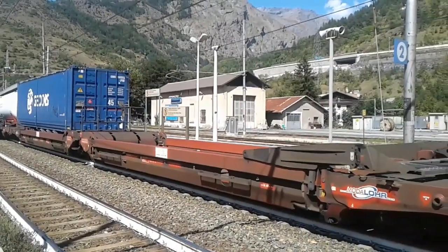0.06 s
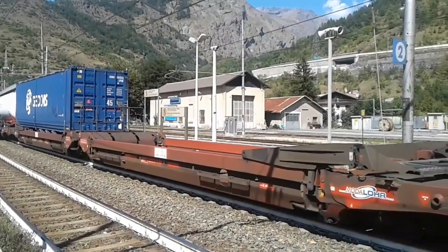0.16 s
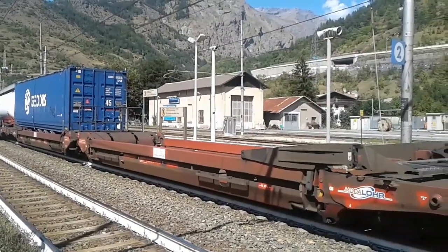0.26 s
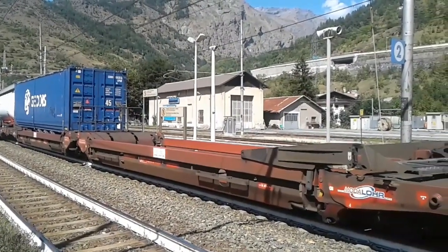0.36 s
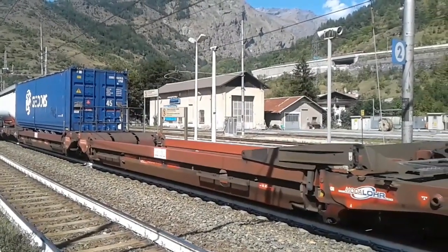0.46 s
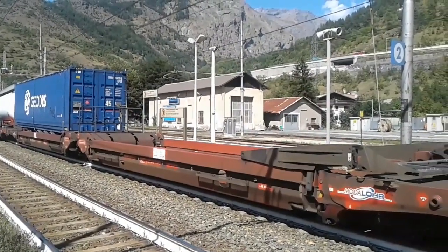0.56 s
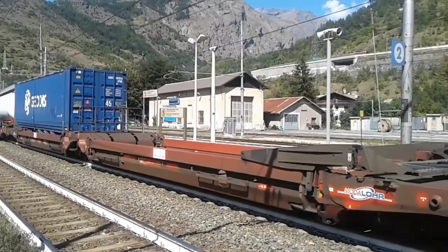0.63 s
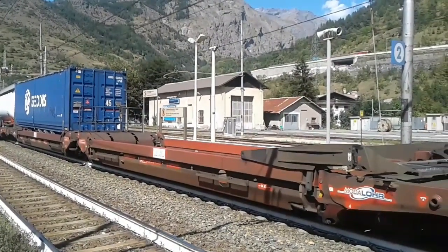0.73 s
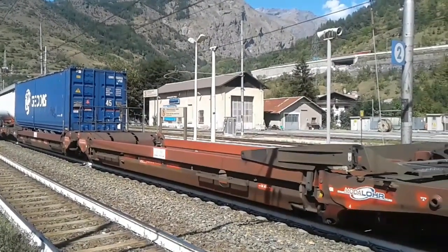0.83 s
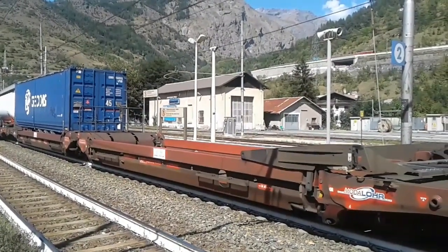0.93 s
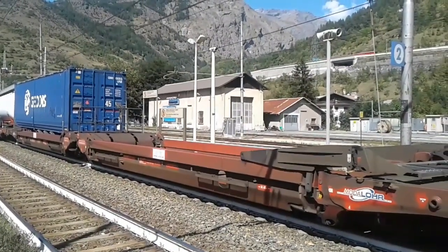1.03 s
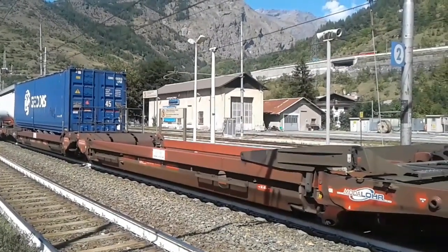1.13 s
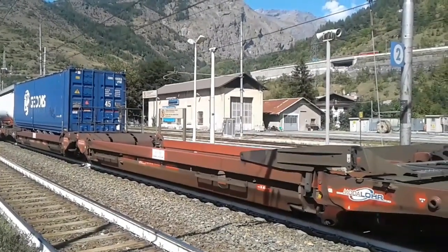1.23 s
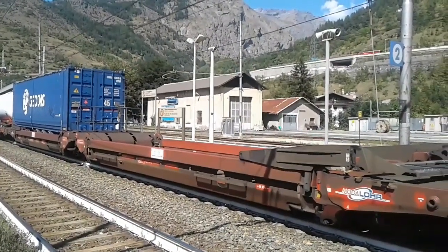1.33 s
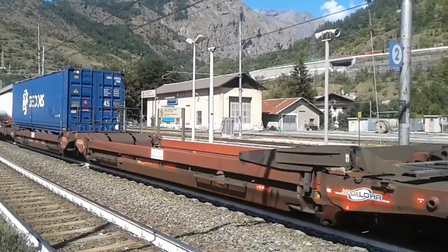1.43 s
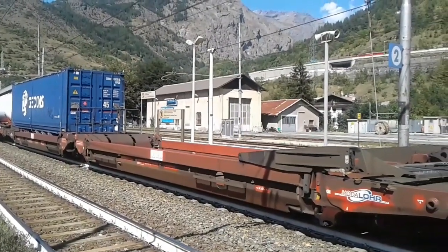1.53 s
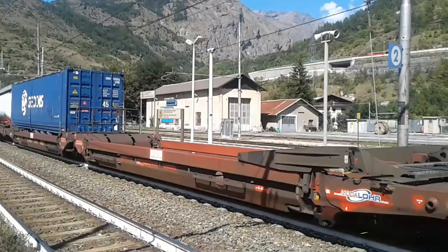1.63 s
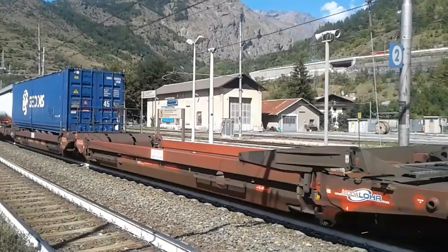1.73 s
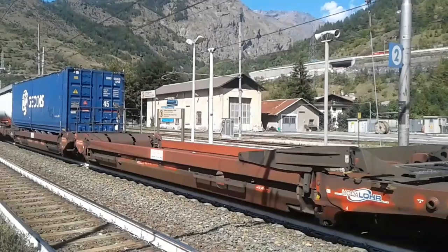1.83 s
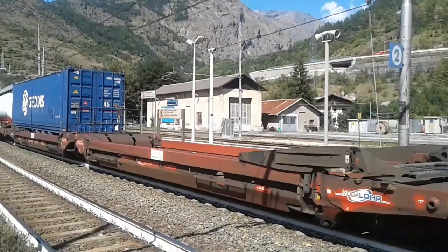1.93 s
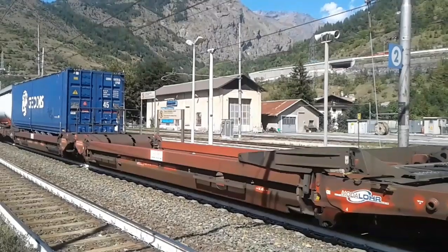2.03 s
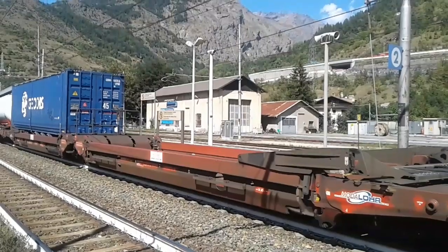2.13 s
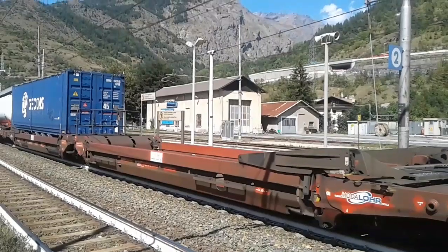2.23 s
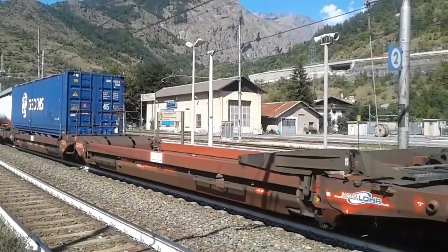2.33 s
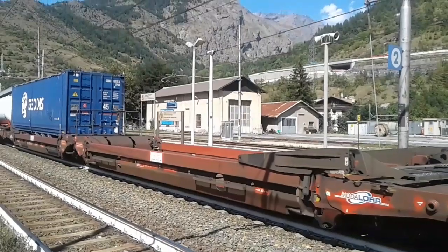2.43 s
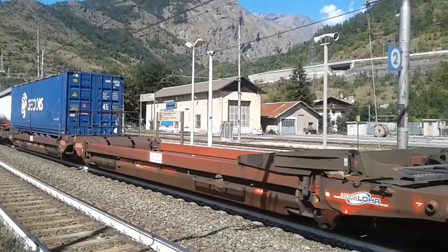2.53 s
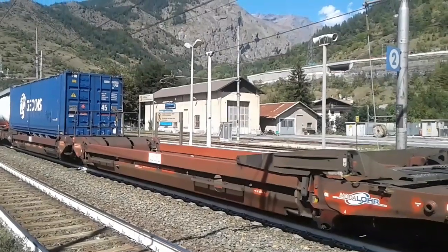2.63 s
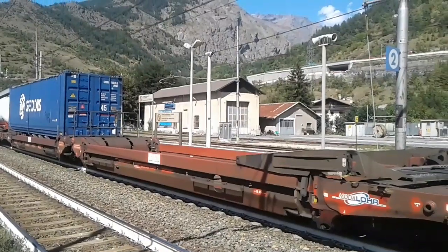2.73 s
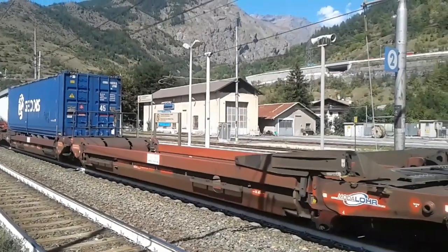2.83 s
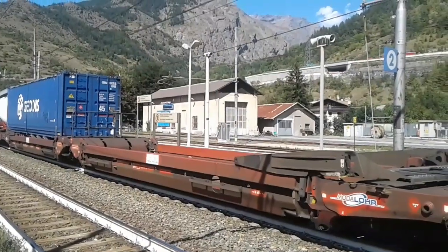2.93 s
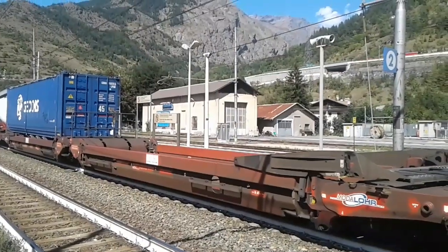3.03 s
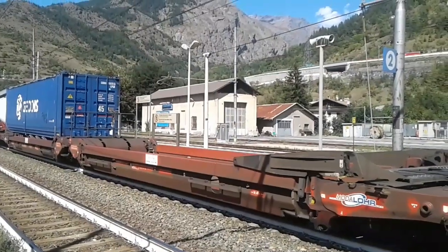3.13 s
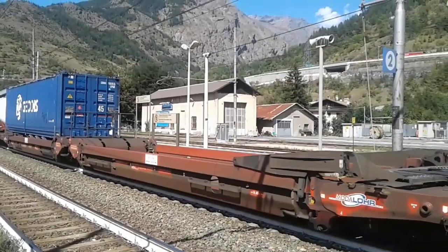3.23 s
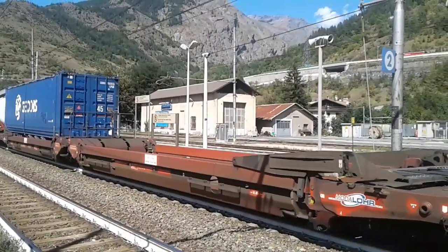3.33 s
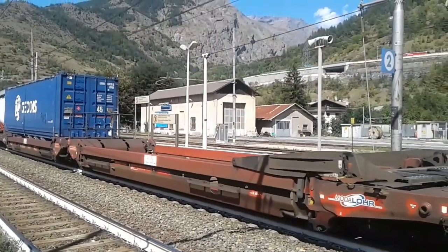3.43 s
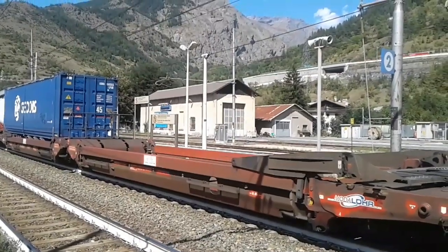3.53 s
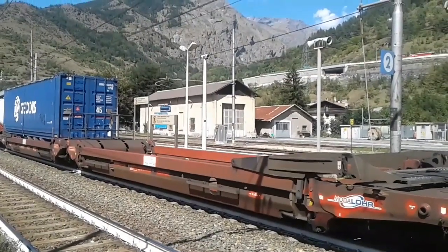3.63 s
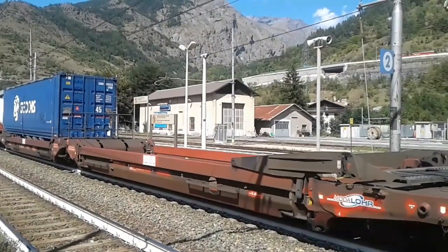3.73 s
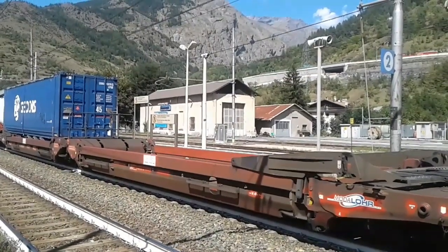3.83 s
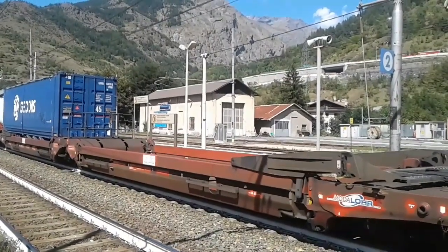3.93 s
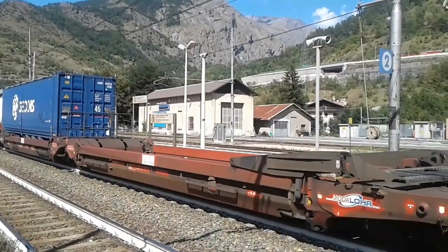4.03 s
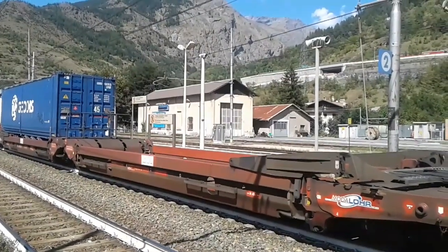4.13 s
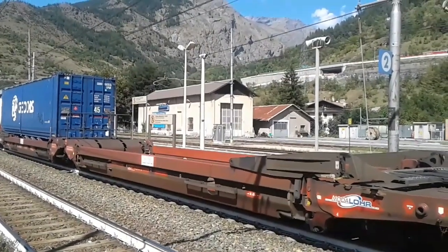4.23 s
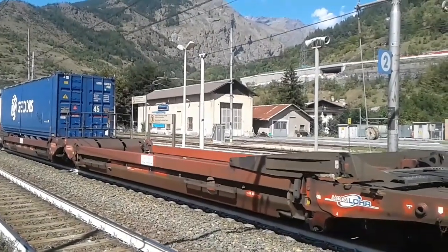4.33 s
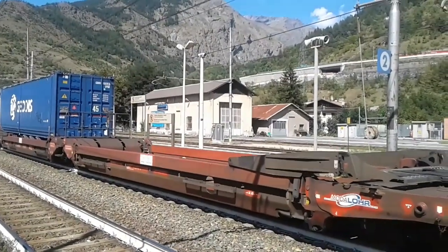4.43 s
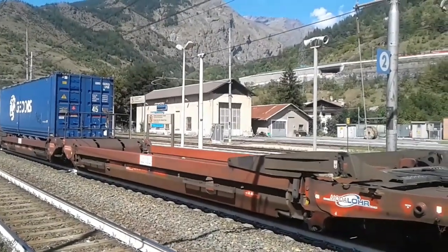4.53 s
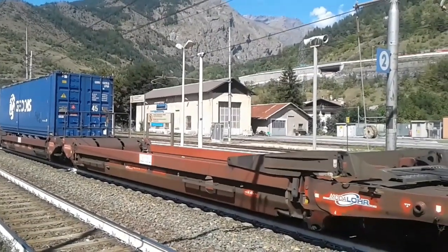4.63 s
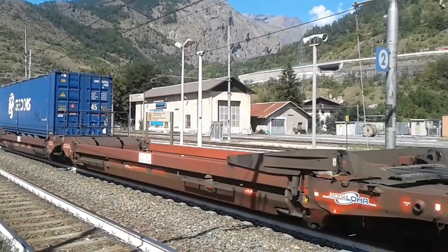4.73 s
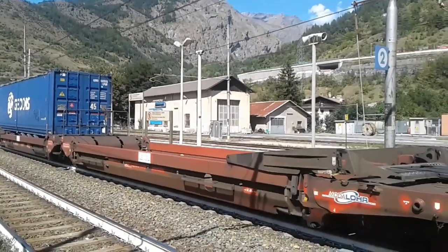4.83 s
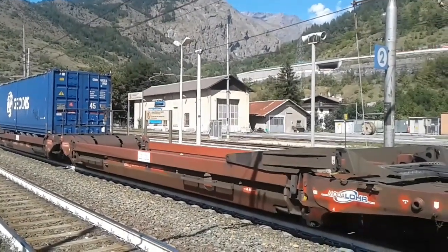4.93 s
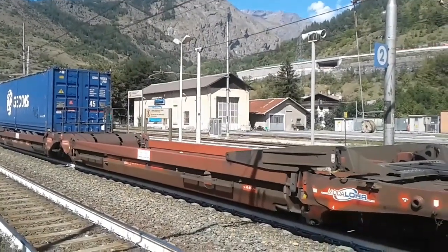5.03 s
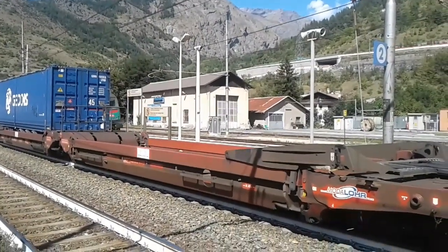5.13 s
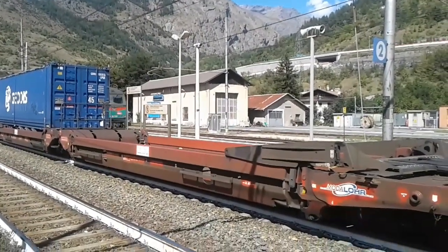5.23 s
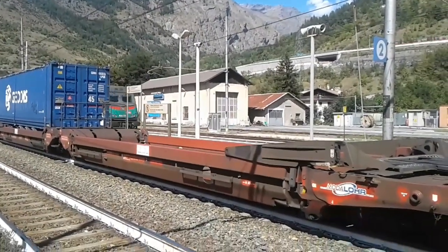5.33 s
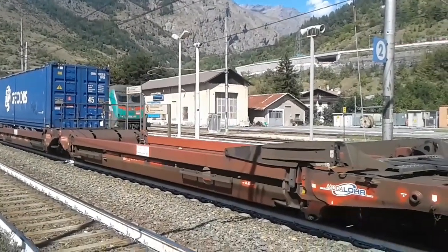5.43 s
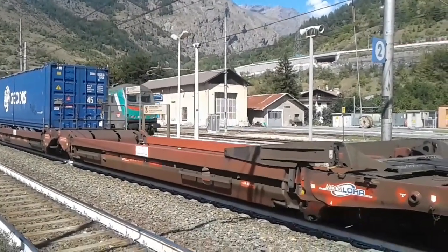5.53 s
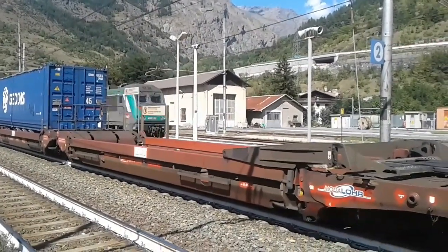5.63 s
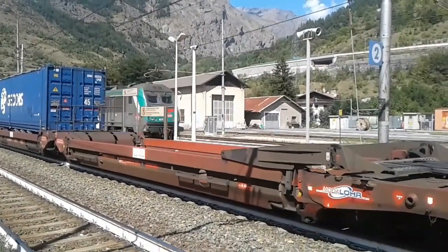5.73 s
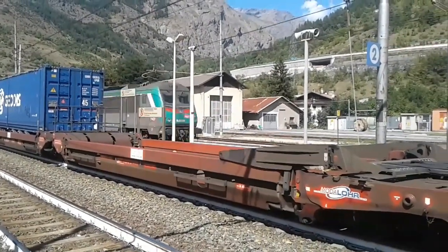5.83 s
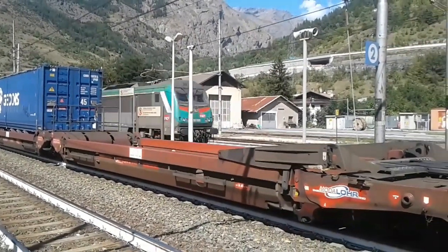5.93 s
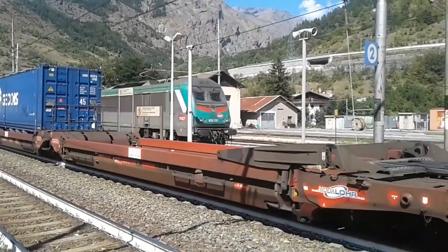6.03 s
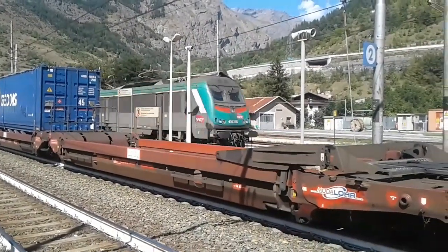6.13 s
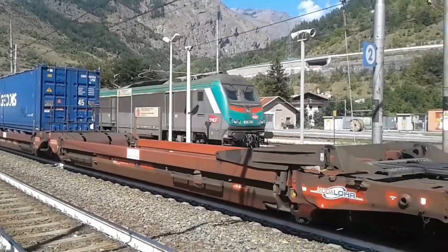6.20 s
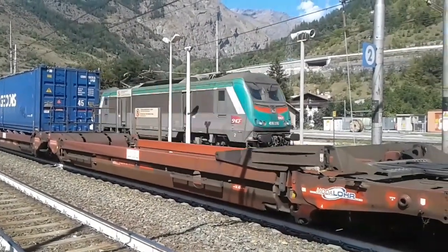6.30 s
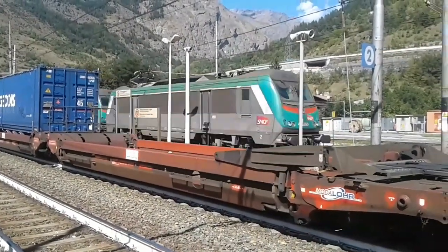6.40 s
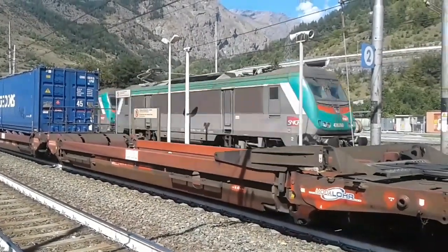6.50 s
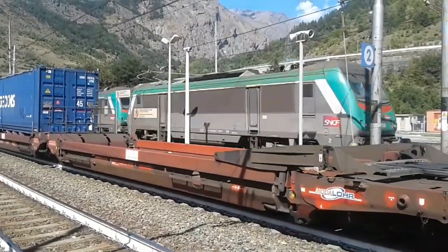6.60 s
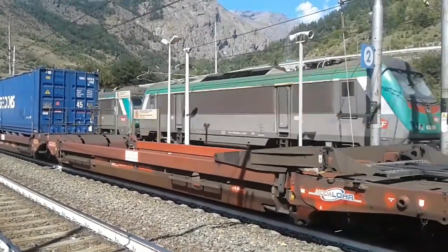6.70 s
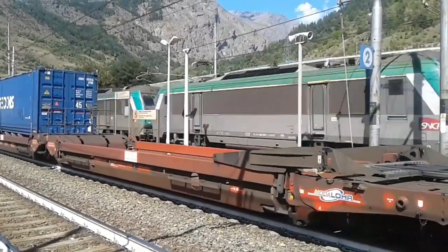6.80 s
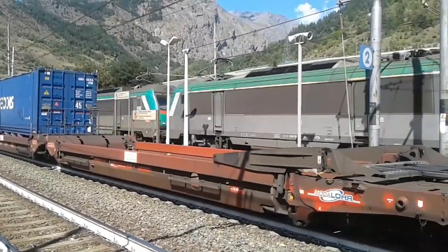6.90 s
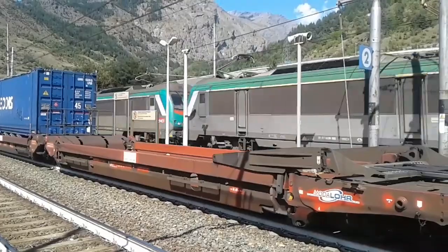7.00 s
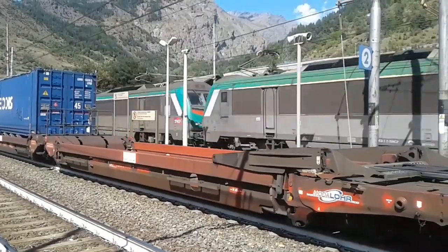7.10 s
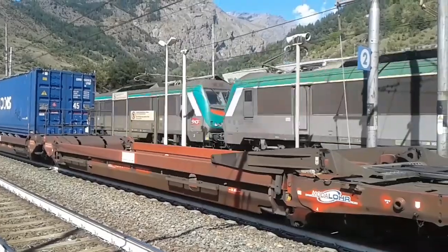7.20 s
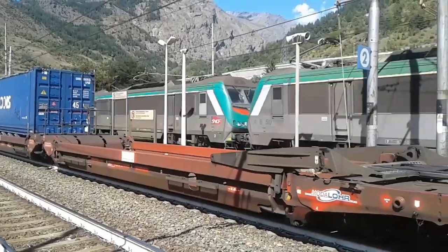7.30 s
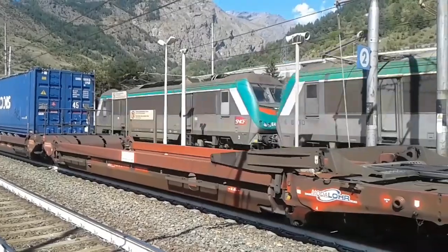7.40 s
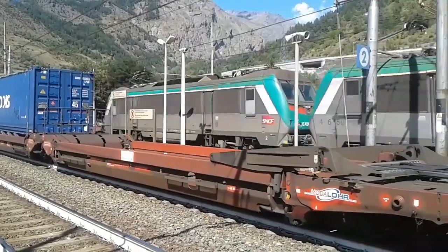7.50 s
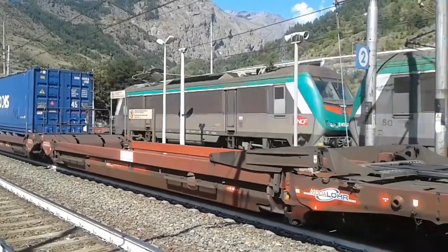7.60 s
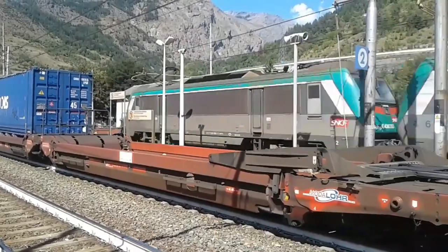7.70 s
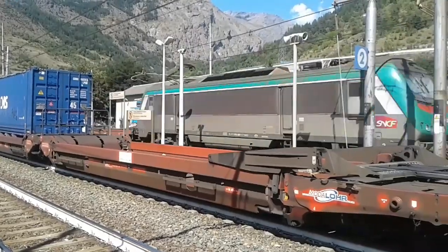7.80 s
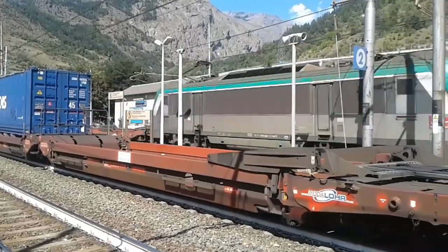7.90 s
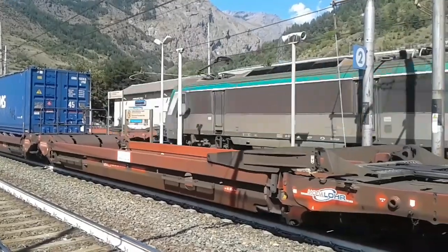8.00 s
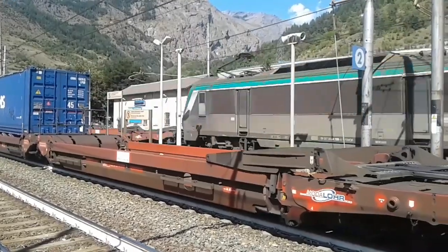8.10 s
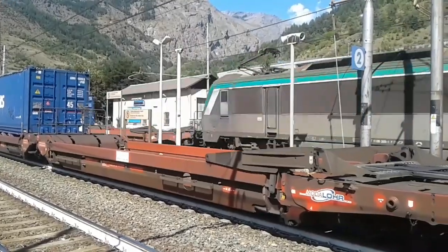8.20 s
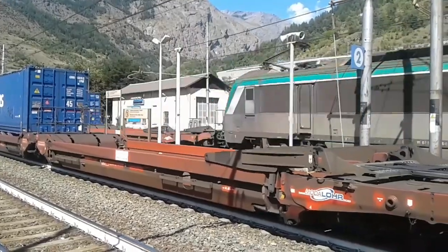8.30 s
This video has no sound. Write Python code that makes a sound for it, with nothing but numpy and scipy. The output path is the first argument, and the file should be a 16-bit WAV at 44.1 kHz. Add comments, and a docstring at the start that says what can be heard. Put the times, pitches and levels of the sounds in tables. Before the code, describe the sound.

Light wind bumps the microphone as electric locomotives draw near, growing to a loud rumble on the rails with whining blowers.

```python
"""Two electric locomotives approach a station and pass behind parked wagons, heard by a small camera.
At first wind buffets the microphone over a far road and the camera's own hiss, ticks and thin tones.
The roar of wheels on rails grows, and cooling blowers whine near 500 Hz. After about 5 s the first
locomotive clears a container, its wheel frames (bogies) thud and wheel rims rub faintly on a curve.
Near 7.4 s the roar is loudest and the whine drops in pitch as the locomotives go by."""
import sys
import numpy as np
from scipy import signal
from scipy.io import wavfile
from scipy.ndimage import uniform_filter1d

SR = 44100
rng = np.random.default_rng(int(sys.argv[2]) if len(sys.argv) > 2 else 0)


def wav_out(sig):
    """Save sig, one row per channel (or a flat mono array), as 16-bit PCM at SR to the path in sys.argv[1]."""
    wavfile.write(sys.argv[1], SR, np.round(np.clip(np.atleast_2d(sig).T, -1, 1) * 32767).astype(np.int16))


N = 368235
TIME = np.arange(N) / SR

# The train's loudness as it nears: (time [s], roar [dB], rumble [dB above roar], air [dB above roar])
TRAIN_LEVELS = [(0, -51, -1, -11.5), (1, -49.5, -2.5, -9), (2, -46, -1.5, -7.5), (3, -43, -3.5, -4),
                (3.5, -42.5, -3, -6), (4.5, -40.5, -1.5, -6.5), (5.4, -37, -2, -6.5), (6.1, -31, -3, -5),
                (6.4, -27.5, -3, -4), (6.6, -24, -4.5, -6), (6.8, -24, -2.5, -6), (7, -22.5, -2.5, -4.5),
                (7.4, -21, -1.5, -5.5), (7.7, -22.5, -0.7, -5.5), (8.35, -21.5, -1, -6.5)]


def amp(db):
    """Turns decibels into a gain."""
    return 10 ** (np.asarray(db) / 20)


def evened(x):
    """Scales a signal to an average strength (rms) of 1."""
    return x / np.sqrt(np.mean(x ** 2) + 1e-20)


def span(start_s, end_s, fade_s):
    """1 between the two times, with soft edges just outside."""
    return np.clip(np.minimum(TIME - start_s, end_s - TIME) / fade_s + 1, 0, 1) ** 2


def bell(at_s, half_s):
    """A smooth swell of height 1."""
    return np.exp(-.5 * ((TIME - at_s) / half_s) ** 2)


def curve(rows):
    """A soft on/off gate over a table's time range, then its other columns at every sample."""
    times, *columns = np.transpose(rows)
    return [span(times[0], times[-1], 0.055)] + [np.interp(TIME, times, c) for c in columns]


def noise(shape, patchy_db, lo_hz=0, hi_hz=SR / 2):
    """Noise of a given spectrum with drifting louder patches; rms 1 between lo_hz and hi_hz."""
    hz = np.fft.rfftfreq(2048, 1 / SR)
    real, imag, patches = rng.standard_normal((N // 512 + 5, 1025, 3)).T
    patches = evened(uniform_filter1d(uniform_filter1d(patches, size=14, axis=0), size=8, axis=1))
    shape_hz, db = np.transpose(shape)
    gain = amp(np.interp(np.log(hz + 1), np.log(shape_hz + 1), db, -150, -150))
    band_share = np.sum(gain[(hz >= lo_hz) & (hz <= hi_hz)] ** 2) / np.sum(gain ** 2)
    spectra = (real + 1j * imag) * gain[:, None] * amp(patchy_db * patches)
    return evened(signal.istft(spectra, nperseg=2048, noverlap=1536)[1][:N]) / np.sqrt(band_share)


def fuzzy_tone(hz, width_hz, steady):
    """A tone of rms 1: one share is steady, the rest wavers at random over width_hz."""
    pole = np.exp(-np.pi * abs(width_hz) / SR)
    waver = signal.lfilter([1], [1, -2 * pole, pole * pole], rng.standard_normal((N, 2)) @ [1, 1j])
    waver /= np.sqrt(np.mean(abs(waver) ** 2))
    tone = np.exp(2j * np.pi * (np.cumsum(hz * np.ones(N)) / SR + rng.random()))
    return np.sqrt(2) * (tone * (np.sqrt(steady) + np.sqrt(1 - steady) * waver)).real


def doppler(nearest_s, speed_m_s=18.9, track_distance_m=18.9, sound_m_s=343.):
    """Pitch factor of a passing source: higher as it comes, lower as it leaves."""
    along_m = speed_m_s * (nearest_s - TIME)
    return 1 + speed_m_s / sound_m_s * along_m / np.hypot(along_m, track_distance_m)


def wavering(db, swells, depth_db=1.24, fastest_hz=4.):
    """A level in dB that drifts at random and swells at given moments."""
    rates_hz = fastest_hz * np.linspace(.2, 1, num=12)
    drift = evened(sum(np.sin(2 * np.pi * (hz * TIME + rng.random())) for hz in rates_hz))
    return db + depth_db * drift + sum(lift_db * bell(s, 0.11) for s, lift_db in swells)


def camera_tones():
    """Thin electrical tones: some steady, some switching on and off."""
    # Tones that never stop: (pitch [Hz], level [dB])
    steady = [(1816, -59.5), (14000, -102)]
    # Short tones: (start [s], end [s], pitch [Hz], level [dB])
    brief = [(0, .3, 1248, -62), (1.42, 2.32, 6080, -89), (1.42, 2.32, 13167, -89), (3.93, 4.27, 7675, -87),
             (3.93, 4.27, 15350, -85)]
    out = sum(amp(db) * fuzzy_tone(hz, 2.5, .92) for hz, db in steady)
    return out + sum(amp(db) * fuzzy_tone(hz, 12., .92) * span(a, b, .01) for a, b, hz, db in brief)


def camera_ticks(ring_hz=9650, ring_s=.005, round_s=.64, gap_s=.008):
    """A mechanism ticks three times a round; each tick is a tiny high ring struck twice."""
    # Rounds the mechanism skips: (round number [from 0])
    silent_rounds = [2, 6]
    t = np.arange(600) / SR
    ring = amp(-60 * t / ring_s) * np.sin(2 * np.pi * ring_hz * t) * np.minimum(t / 0.0014, 1)
    rounds = np.setdiff1d(np.arange(N / SR / round_s), silent_rounds)
    times = np.add.outer(round_s * rounds - .0772, [0, .1, .32]).ravel()
    strikes = np.zeros(N + SR)
    for s in times[times > 0]:
        db = rng.normal(-68, 0.5)
        strikes[round(s * SR)] += amp(db)
        strikes[round((s + gap_s) * SR)] += amp(db - 0.5)
    return signal.oaconvolve(strikes, ring / abs(ring).max())[:N]


def far_road(level_db=-57.5):
    """Traffic on a far valley road blends into a steady low drone."""
    # Traffic spectrum: (frequency [Hz], level [dB])
    spectrum = [(15, -20), (30, -1.5), (60, 6), (150, -6.5), (400, -24)]
    return amp(level_db) * noise(spectrum, 1.1)


def low_buffets(lull_db=-58.5):
    """Lumpy low noise: wind on the microphone at first, then thuds of the bogies after about 5 s."""
    # Buffets: (time [s], half length [s], level [dB])
    buffets = [(0.217, 0.03, -44), (.33, .03, -51.5), (.55, 0.048, -49.5), (0.74, .04, -50),
               (.95, .04, -40.5), (1.23, 0.11, -44.5), (1.7, .04, -49), (2.05, 0.28, -59),
               (2.8, 0.16, -50.5), (3.1, 0.02, -44), (3.282, 0.033, -46), (3.45, 0.15, -43.5),
               (3.76, 0.043, -38.5), (3.92, .04, -42), (4.3, 0.21, -50), (4.66, 0.1, -48.5),
               (4.99, 0.053, -44), (5.207, 0.042, -43.5), (5.386, .07, -45), (5.828, 0.065, -43.5),
               (6.108, 0.075, -39), (6.293, 0.046, -39), (6.445, 0.043, -40.5), (6.605, 0.044, -30),
               (6.781, 0.044, -30), (6.998, 0.044, -34)]
    # Buffet spectrum: (frequency [Hz], level [dB])
    spectrum = [(15, -30.5), (30, -28), (50, -7.5), (90, 5.5), (140, 2.5), (200, -10.5), (300, -40)]
    level = amp(lull_db) + sum(amp(db) * bell(s, half_s) for s, half_s, db in buffets)
    return level * noise(spectrum, 0.57, 35, 200)


def wheel_rims(rise_s=.02, end_s=8.7):
    """Wheel rims rub faintly on the curve before the platform; each rub starts fast and dies away."""
    # Rubs: (start [s], level [dB], decay [dB per s])
    rubs = [(5.53, -79, 42), (5.95, -75, 200), (6.05, -75, 21.5), (6.37, -72.5, 51), (6.55, -84, 9)]
    # Squeal bands: (pitch [Hz], width [Hz], relative level [dB])
    bands = [(6750, 500, -4.5), (7800, 900, -2.5)]
    level = sum(span(s, end_s, rise_s) * amp(db - decay * np.maximum(TIME - s, 0))
                for s, db, decay in rubs)
    return level * evened(sum(amp(db) * fuzzy_tone(hz, width, 0) for hz, width, db in bands))


def body_drone():
    """A broad hum on the approach, then the locomotive body drones in swells as it passes."""
    # Drone swells: (time [s], level [dB above roar])
    swells = [(7.23, -9.5), (7.52, -1), (7.95, -5.5)]
    # Drone tones: (pitch [Hz])
    pitches = [272.2, 305]
    # Approach hum: (time [s], pitch [Hz], level [dB above roar])
    hum = [(4.9, 395, -21), (5.5, 391, -11.5), (6, 388.4, -4.5), (6.5, 382.6, -11)]
    level = sum(amp(db) * bell(s, 0.12) for s, db in swells)
    drone = level * sum(fuzzy_tone(hz, 22., .25) for hz in pitches)
    on, hum_hz, hum_db = curve(hum)
    return drone + on * amp(hum_db) * fuzzy_tone(hum_hz, 37.0, 0)


def blower_echoes(rich_hz=468, plain_hz=506, settle_s=4., sink_hz_per_s=3.):
    """Echoes smear the whine into bands of noise that grow louder."""
    # Multiples 1-4 of the rich whine: (width [Hz], relative level [dB])
    bands = [(30, -1), (60, -6.5), (80, -7), (110, -6.5)]
    hz = rich_hz * doppler(nearest_s=7.4) + sink_hz_per_s * np.maximum(settle_s - TIME, 0)
    rich = sum(amp(db) * fuzzy_tone(k * hz, width, 0) for k, (width, db) in enumerate(bands, 1))
    return amp(-8. + .5 * TIME) * (rich + amp(-1.5) * fuzzy_tone(plain_hz, 37.0, 0))


def whine(hz, tone_db, overtone_db, kind):
    """Fan blades make a tone and its multiples; unsteady speed roughens the higher ones more."""
    # For each kind, multiples from 2 up: (level [dB above overtone_db])
    multiples = {"rich": [-3.5, 0, 2.5], "pure": [0]}
    # For each kind, how clean the tone is: (width [Hz], steady share [0-1])
    purity = {"rich": (8., .78), "pure": (12., .85)}
    width_hz, steady = purity[kind]
    overtones = sum(amp(db) * fuzzy_tone(k * hz, k * width_hz, steady ** 2)
                    for k, db in enumerate(multiples[kind], 2))
    return amp(tone_db) * fuzzy_tone(hz, width_hz, steady) + amp(overtone_db) * overtones


def blowers(clear_s=5.23, clear_rise_s=.8):
    """Each cooling fan has its own pitch drop, and fades and swells as echoes mix with its direct sound."""
    # Fans: (start [s], end [s], nearest at [s], pitch then [Hz], drift [Hz per s], "rich" or "pure")
    fans = [(0, 5.6, 7.3, 463, -3.8, "rich"), (1.6, 5.2, 7.3, 457, -2, "rich"),
            (5.4, 8.35, 7.25, 472, 0, "rich"), (.3, 7.85, 7.55, 505, 1.6, "pure"),
            (6.3, 7.1, 7.4, 487, 0, "pure"), (7.6, 8.35, 8.9, 501, 0, "pure")]
    # Same fans: (tone [dB above roar], overtones [dB above roar], gain once clear of the container [dB],
    # tone swells, overtone swells); each swell is (time [s], lift [dB])
    fan_levels = [(-14.5, -23, 3, [(.35, 17), (1.12, 14.5), (1.79, 10), (2.24, 16.5), (3.7, 12), (4.26, 9)],
                  [(.8, 8), (4.75, 11), (5.05, 6)]), (-12.5, -15.5, 0, [(2.73, 11), (3.4, 13)], [(2.5, 2.5),
                  (3.3, -1.5), (3.7, 2), (5.2, 1)]), (-11, -15, 0, [(5.65, 3), (5.95, 3), (7, 1.5),
                  (7.8, 7)], [(5.75, 5), (7.3, 4), (7.95, 2)]), (-12, -28, 8, [(1.7, 12.5), (2.55, 7),
                  (4.64, 4), (6, 9), (6.3, 7.5), (7.1, 4), (7.66, 7.5)], [(7.1, 9)]),
                  (-13, -28, -1, [(6.6, 12)], []), (-11.5, -18, 0, [(8.13, 13.5)], [])]
    clear = np.clip((TIME - clear_s) / clear_rise_s + .5, 0, 1)  # 0 behind the container, 1 past it
    out = 0
    for (start, end, nearest_s, blade_hz, drift, kind), levels in zip(fans, fan_levels):
        tone_db, overtone_db, clear_db, tone_swells, overtone_swells = levels
        hz = (blade_hz + drift * (TIME - nearest_s)) * doppler(nearest_s)
        sound = whine(hz, wavering(tone_db, tone_swells), wavering(overtone_db, overtone_swells), kind)
        out += span(start, end, .05) * amp(clear_db * clear) * sound
    return out


def cooling_air(level_db):
    """Rushing cooling air hisses."""
    # Air spectrum: (frequency [Hz], level [dB])
    spectrum = [(1500, -30), (2200, -0.5), (2800, -4.5), (3500, -6), (4000, -11.5), (4500, -21),
                (5200, -35), (6000, -45.5), (7000, -75)]
    return amp(level_db) * noise(spectrum, 0.81, 2020, 4600)


def wheel_fizz():
    """Wheels touching the rails make a high fizz, heard only close by."""
    # Fizz spectrum: (frequency [Hz], level [dB])
    spectrum = [(4500, -16), (5300, -0.5), (7000, -6), (8300, -13), (9500, -26.5), (11000, -45.5)]
    # Fizz loudness: (time [s], level [dB above roar])
    levels = [(4.5, -60), (6, -54), (6.7, -48), (7.1, -40), (7.5, -40), (8.35, -44.5)]
    near, db = curve(levels)
    return near * amp(db) * noise(spectrum, 1.4)


def rolling_wheels(rumble_db):
    """Wheels roar on the rails, and the frames that hold them rumble."""
    # Roar and rumble spectra: (frequency [Hz], level [dB])
    roar = [(300, -38), (400, -9), (480, -3), (600, -0.5), (900, -6), (1200, -7), (1620, -12), (2000, -9),
            (2600, -29.5)]
    rumble = [(20, -43), (40, -31.5), (60, -15.5), (95, 1), (130, -9.5), (160, 3), (270, -1.5), (350, -2),
              (430, -6.5), (600, -27.5)]
    return amp(-1.0) * noise(roar, 0.73, 560, 1300) + amp(rumble_db) * noise(rumble, 1.1, 160, 420)


def scene():
    """All sources at one microphone; most of the train's sounds rise together with its roar."""
    _, roar_db, rumble_db, air_db = curve(TRAIN_LEVELS)
    train = rolling_wheels(rumble_db) + cooling_air(air_db) + wheel_fizz()
    train += blower_echoes() + body_drone() + blowers()
    outdoors = amp(roar_db) * train + wheel_rims() + low_buffets() + far_road()
    return (outdoors + camera_tones() + camera_ticks())[None]


def record(dry):
    """The camera adds hiss and cuts the highest treble; the sound ends in a short fade."""
    # Hiss spectrum: (frequency [Hz], level [dB])
    hiss = [(3000, -17), (5000, -2.5), (7000, -5), (9000, -9), (11500, -12.5), (13500, -5.5), (15000, -9.5),
            (16500, -3)]
    noisy = dry + amp(-78.5) * noise(hiss, .6, 7000, 15600)
    noisy *= span(0, TIME[-1] - .006, .006)
    low_pass = signal.firwin(2047, cutoff=15720, window=("kaiser", 9), fs=SR)
    return signal.oaconvolve(noisy, low_pass[None], "same")


dry = scene()
out = record(dry)
wav_out(out)
```